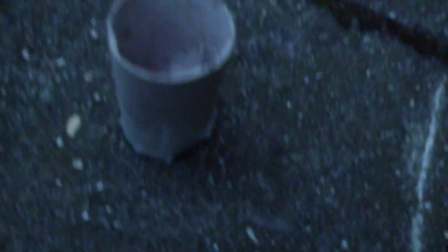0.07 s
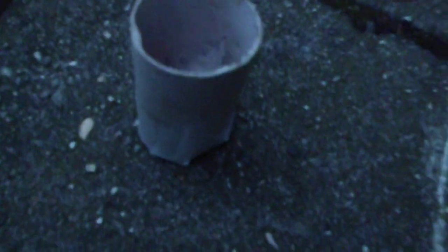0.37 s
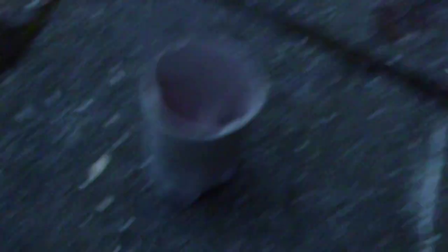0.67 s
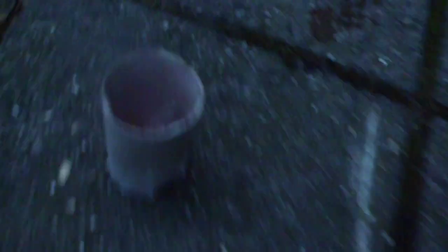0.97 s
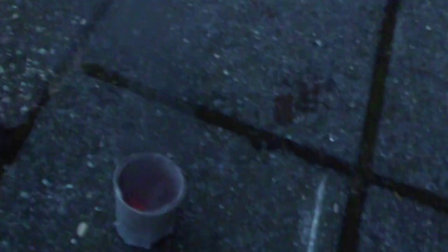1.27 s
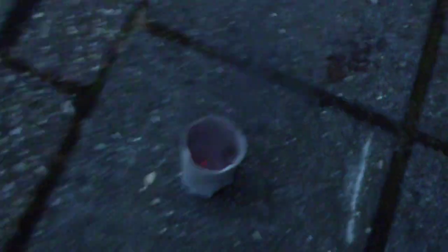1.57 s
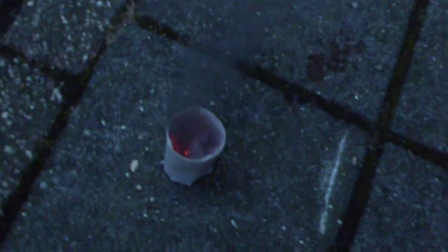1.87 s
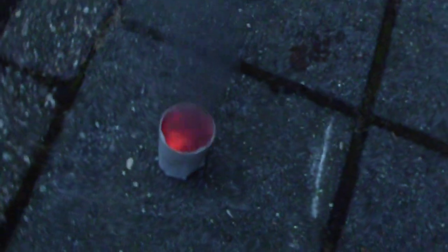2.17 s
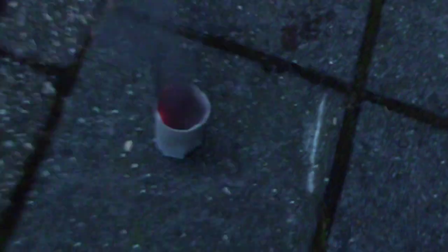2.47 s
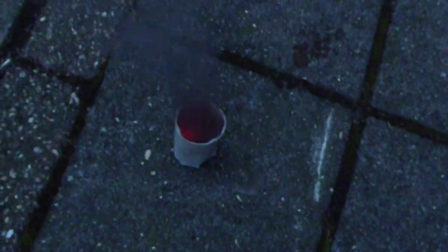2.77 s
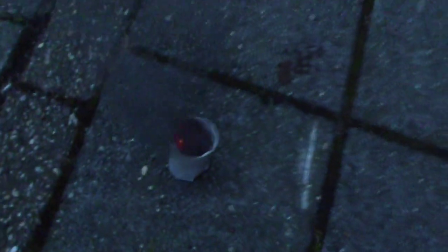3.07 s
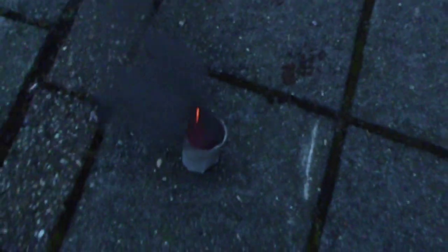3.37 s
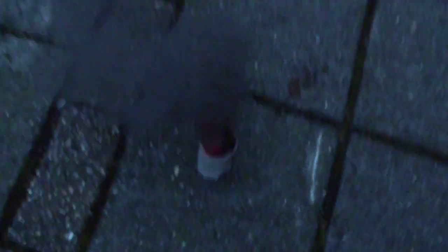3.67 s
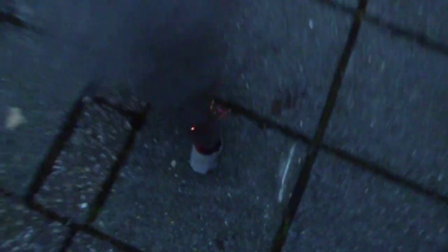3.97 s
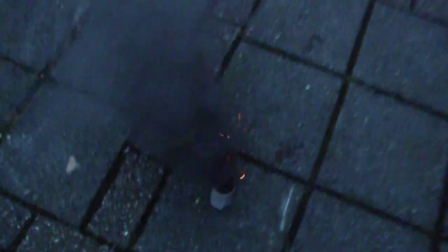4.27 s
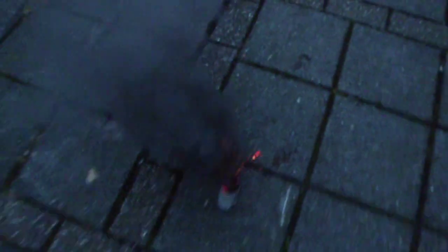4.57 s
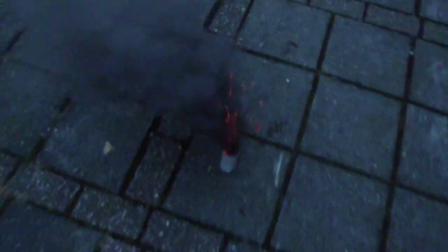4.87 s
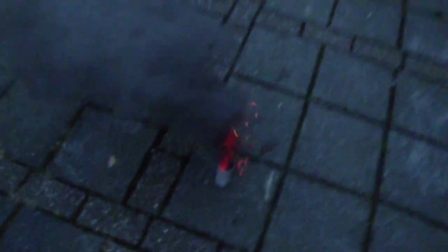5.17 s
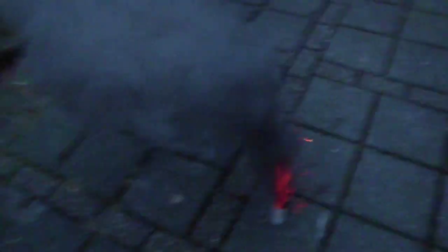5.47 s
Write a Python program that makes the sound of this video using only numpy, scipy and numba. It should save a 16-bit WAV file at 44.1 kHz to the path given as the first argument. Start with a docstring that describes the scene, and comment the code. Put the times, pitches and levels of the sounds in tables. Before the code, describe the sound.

A smoke mixture hisses steadily in a paper cup outdoors, with a few sharp clicks and dull bumps from handling the camera.

```python
"""A smoke mixture hisses in a paper cup on paving slabs, a step from a small hand-held camera. Rushing gas and
fine sputter blow the cup's resonances, which rise as the burn takes hold; once it spits. Up close, the camera's
case clicks and bumps in the hand. A low outdoor rumble lies underneath, and a faint wall echo colours hiss and
rumble. The recorder dulls the top, and the hardest clicks are flattened."""
import sys
import numpy as np
from scipy import signal
from scipy.fft import rfft, irfft
from scipy.io import wavfile
from scipy.ndimage import uniform_filter1d, map_coordinates
from numba import njit

SR = 44100
rng = np.random.default_rng(int(sys.argv[2]) if len(sys.argv) > 2 else 0)


def persist_wave(psi):
    """Save psi, clipped to +-1, as 16-bit WAV."""
    counts = np.round(np.clip(psi, -1, 1) * 32767).astype(np.int16)
    wavfile.write(sys.argv[1], SR, np.atleast_2d(counts).T)


N = 247842
TIME = np.arange(N) / SR
HIT_MS = 1000 * TIME[:2048]  # time within a one-shot

# The burn flares, sinks back, then takes hold. Each row: time in seconds, fader in dB,
# send of the upper pair in dB.
BURN_LEVELS = [(0,-32.5,-6.5),(.42,-33,-6.5),(.58,-29,-7),(.82,-29.5,-6.5),(.97,-34.3,-2.5),(1.3,-32,-5),(1.72,-34,-1),
               (2.3,-30,-4),(2.62,-28.5,-3),(3.3,-28.5,-3.5),(3.9,-29,-1.5),(4.85,-28,-2),(5.15,-28.5,-3),(5.62,-28,-2.5)]
# Hot gas tunes the cup. Each row: time in seconds, low resonance in Hz, send of its whistling core in dB.
CUP_TUNING = [(0,1132,-8.5),(.85,1150,-10),(1.3,1217,-11.5),(1.9,1197,-12.5),(2.25,1340,-15.5),(2.8,1255,-8.5),(3.75,1247,-0.5),(4.3,1354,-10),(5.62,1464,-16)]
# The body of the hiss. Each row: multiple of the low resonance, width in Hz, gain in dB.
LOW_MODES = [(.97, 460, -1), (.52, 540, -20)]
# An overtone on the body's shoulder. One row: multiple of the upper resonance, width in Hz, gain in dB.
OVERTONE = (0.48, 597, -6.5)
# The overtone swells with the burn. Each row: time in seconds, added gain in dB.
OVERTONE_SWELL = [(0,-2),(3.3,-1.5),(4.2,4),(5.62,2.5)]
# The upper resonance is a close pair. Each row: multiple of its pitch, width in Hz, gain in dB.
UPPER_MODES = [(0.928, 549, 2), (1.049, 537.4, 3)]
# The pair drifts. Each row: time in seconds, pitch in Hz, lean towards the lower mode in dB.
UPPER_TUNING = [(0,3490,-3.5),(1.3,3564,-4),(2.3,3510,-1.5),(3.1,3550,-2.5),(3.65,3420,4),(4.4,3500,-1),(5.15,3560,-1),(5.62,3740,-0.5)]
# The top sizzle shifts as the camera moves. Each row: time in seconds, pitch in Hz, send in dB,
# depth of the notch below it from 0 to 1.
SIZZLE_PATH = [(0,4600,-9,.92),(1.7,4610,-10.5,0.74),(2.5,4580,-12.5,0.2),(3.3,4290,-18.5,0.1),(3.75,4480,-16,0),(4.35,5010,-13.5,0.9),(5.05,5200,-12.5,0.2),(5.62,5310,-18,0.1)]
# A scoop between the low and upper resonances moves with the camera. Each row: time in seconds,
# centre in Hz.
SCOOP_PATH = [(0,2960),(.7,2940),(1.8,2305),(4.3,2710),(5.62,2950)]
# The tone of the outdoor bed. Each row: frequency in Hz, relative spectral level in dB.
RUMBLE_SPECTRUM = [(10,-4.5),(25,1.5),(45,-6),(100,-6.5),(200,-7.5),(400,-6.5),(700,-6.5),(1200,-8),(3000,-37)]
# The case clicks, plus one faint sputter of the mixture at 2.36 s sounded the same way. Each row: start in
# seconds, peak into the recorder in dB, brightest pitch in Hz, # spread in octaves, rattle in dB against the
# snap.
CASE_CLICKS = [(0.687,-12,3500,.7,-15),(.7092,-16.5,3170,0.51,-6),(0.789,-12,2700,0.34,-10),(0.8134,-1.5,5800,0.55,-20),(0.834,-19,2820,0.19,-5),
               (1.0227,3,4180,0.51,-9.5),(1.1723,-3.5,3200,1.3,-10),(1.229,-24,2310,.3,-13),(1.3078,-7,3410,0.11,-17),(1.362,-6.5,2740,0.36,-15),
               (2.361,-23.5,2300,0.27,-9),(2.4728,-14,2980,0.4,-10),(3.299,-21.5,3300,0.46,-15),(4.0977,1,4030,0.74,-7)]
# The ring of the case. Each row: pitch in Hz, gain in dB, time to fall 60 dB in ms.
CASE_MODES = [(2350,-1.5,13),(3003,-2.5,12),(3530,-2,6),(3970,-3.5,2.7),(4530,-0.5,4),(5380,-1,4)]
# Dull bumps of the hand. Each row: start in seconds, peak in dB, pitch in Hz, time to fall 60 dB in ms,
# knock in dB against the thud.
HAND_BUMPS = [(1.0223,-12.5,286,8,4),(1.0456,-20,417,9,-1),(1.3236,-25,450,10,4),(1.817,-22,262,14,-22),(1.8208,-21,690,34,-11),
              (1.8258,-16,606,4.6,14),(1.835,-21,554,7.5,7),(1.8575,-25.5,346,24,-7),(3.547,-28,190,20,-17),(4.377,-29.5,347,37,-17),
              (4.964,-23,352,20,-13),(5.403,-26.5,220,8.8,-9.5),(5.4506,-16,397,12,3),(5.562,-19.5,340,9,-6),(5.5976,-13.5,387,21,7)]
# One tight cluster of spits. Each row: start in seconds, peak in dB, pitch in Hz,
# time for the pop to fall 60 dB in ms.
SPITS = [(3.483,-18,1950,6),(3.4882,-17,770,21),(3.49,-11,1940,5.3),(3.506,-8,2310,2.9)]


def undb(db):
    """Decibels to gain."""
    return 10 ** (np.asarray(db) / 20)


def unit(x):
    """Scale to rms 1."""
    return x / np.sqrt(np.mean(x ** 2))


def peak(x, db):
    """Scale to a peak level."""
    return x * undb(db) / np.abs(x).max()


def curves(table):
    """Automation lanes: each column joined by straight lines in time."""
    times, *columns = np.transpose(table)
    return [np.interp(TIME, times, column) for column in columns]


def add(out, start_s, sound):
    """Drop a one-shot onto a track."""
    i = int(start_s * SR)
    out[i:i + len(sound)] += sound[:N - i]


@njit
def bandpass(x, hz, width_hz):
    """Sweepable state-variable band-pass, gain 1 at the centre."""
    y, band_state, low_state = np.empty(len(x)), 0., 0.
    for i in range(len(x)):
        g, damping = np.tan(np.pi * hz[i] / SR), width_hz / hz[i]
        band = (band_state + g * (x[i] - low_state)) / (1 + g * (g + damping))
        band_state = 2 * band - band_state
        low_state += 2 * g * band
        y[i] = damping * band
    return y


def resonance(x, hz, width_hz):
    """A steep resonance: the band-pass applied twice."""
    centre = hz * np.ones(len(x))
    return bandpass(bandpass(x, centre, width_hz), centre, width_hz)


def ring(hz, t60_ms):
    """A struck mode: a sine that dies away."""
    return np.sin(2 * np.pi * hz * HIT_MS / 1000) * np.exp(-np.log(1000) * HIT_MS / t60_ms)


def wander(per_s):
    """A smooth random modulator with a spread near 1."""
    hold = int(SR / per_s)
    steps = np.repeat(rng.standard_normal(2048)[:N // hold + 1], hold)
    return 1.3 * uniform_filter1d(uniform_filter1d(steps, hold), hold)[:N]


def gas(sputter_db, pops_per_s=900, spread_db=3.5):
    """Turbulent rush, peppered with the tiny pops of burning grains."""
    rush, polarity = rng.standard_normal((2, N))
    sizes = undb(spread_db * np.minimum(rng.exponential(size=N), 5))
    pops = (rng.random(N) < pops_per_s / SR) * sizes * np.sign(polarity)
    return rush + undb(sputter_db) * unit(pops)


def cup_voice(hz, width_hz, sputter_db, flicker_db=0.68):
    """One resonance of the cup, blown by the gas, flickering on its own."""
    return unit(resonance(gas(sputter_db), hz, width_hz)) * undb(flicker_db * wander(25))


def burn(flutter_db=0.35, surge_db=0.38, rush_db=-14, rush_waver_db=2.5):
    """Gas hisses from the cup's mouth in four layers that surge and flutter together."""
    level_db, upper_db = curves(BURN_LEVELS)
    low_hz, core_db = curves(CUP_TUNING)
    sizzle_hz, sizzle_db, _ = curves(SIZZLE_PATH)
    upper_hz, lean_db = curves(UPPER_TUNING)
    swell_db = curves(OVERTONE_SWELL)[0]

    low = sum(undb(db) * cup_voice(ratio * low_hz, width, sputter_db=-17)
              for ratio, width, db in LOW_MODES)
    core = undb(core_db - 2) * cup_voice(low_hz, width_hz=170, sputter_db=-7.5)
    ratio, width, db = OVERTONE
    overtone = undb(db + swell_db) * cup_voice(ratio * upper_hz, width, sputter_db=-8)
    body = unit(low + core + overtone)

    lower, higher = (undb(db) * cup_voice(ratio * upper_hz, width, sputter_db=-10)
                     for ratio, width, db in UPPER_MODES)
    lean = undb(lean_db)
    upper = unit((lean * lower + higher) / np.hypot(lean, 1))

    # the fizz on top slides with the sizzle and fades faster than it does
    fizz = undb(1 + 0.21 * sizzle_db) * cup_voice(1.155 * sizzle_hz, width_hz=2200, sputter_db=6)
    sizzle = unit(cup_voice(sizzle_hz, width_hz=810, sputter_db=-1) + fizz)

    rush = undb(rush_db + rush_waver_db * wander(5.2)) * cup_voice(2730, width_hz=1100, sputter_db=0.5)
    hiss = body + undb(upper_db + 0.18) * upper + undb(sizzle_db + 1.63) * sizzle + rush
    return hiss * undb(level_db + flutter_db * wander(30) + surge_db * wander(7.6))


def reflection_dips(x, notch_ratio=0.885, notch_width_hz=380, scoop_width_hz=350, scoop_depth=0.44):
    """Reflections partly cancel two bands: a notch under the sizzle and a scoop in the mids."""
    sizzle_hz, _, notch_depth = curves(SIZZLE_PATH)
    notched = x - notch_depth * bandpass(x, notch_ratio * sizzle_hz, notch_width_hz)
    return notched - scoop_depth * bandpass(notched, curves(SCOOP_PATH)[0], scoop_width_hz)


def outdoor_rumble(start_db=-45.5, rise_db_per_s=0.56, waver_db=1.5):
    """A dark bed of open-air noise that creeps up and wavers a little."""
    hz, db = np.transpose(RUMBLE_SPECTRUM)
    bin_hz = np.maximum(np.arange(N // 2 + 1) * SR / N, 1)
    tone = undb(np.interp(np.log(bin_hz), np.log(hz), db))
    rumble = irfft(rfft(rng.standard_normal(N)) * tone, N)
    return unit(rumble) * undb(start_db + rise_db_per_s * TIME + waver_db * wander(18))


def wall_echo(x, dull_hz=2400, start_lag_ms=11.8, closing_ms_per_s=0.749):
    """The camera backs towards a wall: a dull echo tightens and grows, sweeping a faint comb upwards."""
    lag_ms = start_lag_ms - closing_ms_per_s * TIME
    wet = 0.044 + 0.04 * TIME
    dull = signal.sosfiltfilt(signal.butter(2, dull_hz, fs=SR, output="sos"), x)
    echo = map_coordinates(dull, [np.arange(N) - lag_ms * SR / 1000], order=1)
    return x + wet * echo


def case_clicks(low_cut_hz=1900, rattle_attack_ms=0.36, rattle_t60_ms=11, rattle_breadth=2.86):
    """Each snap rings the case around its own brightest pitch, and the parts rattle briefly."""
    out = np.zeros(N)
    hz, mode_db, t60_ms = np.transpose(CASE_MODES)[:, :, None]
    low_cut = signal.butter(3, low_cut_hz, "high", fs=SR, output="sos")  # small parts radiate no bass
    attack = 1 - np.exp(-HIT_MS / rattle_attack_ms)
    envelope = attack * np.exp(-np.log(1000) * HIT_MS / rattle_t60_ms)
    for start, db, bright_hz, octaves, rattle_db in CASE_CLICKS:
        weights = undb(mode_db) * np.exp(-0.5 * (np.log2(hz / bright_hz) / octaves) ** 2)
        snap = peak(np.sum(weights * ring(hz, t60_ms), axis=0), 0)
        noise = rng.standard_normal(len(HIT_MS))
        rattle = envelope * unit(resonance(noise, bright_hz, rattle_breadth * octaves * bright_hz))
        click = signal.sosfilt(low_cut, snap + undb(rattle_db) * rattle)
        add(out, start, peak(click, db))
    return out


def hand_bumps(knock_hz=850, knock_t60_ms=7):
    """A finger's push swings the camera body: a short thud with a woody knock."""
    out = np.zeros(N)
    for start, db, hz, t60_ms, knock_db in HAND_BUMPS:
        knock = undb(knock_db) * ring(knock_hz, knock_t60_ms)
        add(out, start, peak(ring(hz, t60_ms) + knock, db))
    return out


def spits(puff_db=-13):
    """Gas pockets burst in the mixture: a quick pitched pop with a longer, breathy tail."""
    out = np.zeros(N)
    for start, db, hz, t60_ms in SPITS:
        noise = rng.standard_normal(len(HIT_MS))
        puff = unit(resonance(noise, hz, width_hz=hz)) * np.exp(-HIT_MS / t60_ms)
        add(out, start, peak(ring(hz, t60_ms) + undb(puff_db) * puff, db))
    return out


def scene():
    """The mono mix: cup and rumble feed the echo, the handling stays dry."""
    outdoors = reflection_dips(burn()) + spits() + outdoor_rumble()
    return (wall_echo(outdoors) + case_clicks() + hand_bumps())[None]


def record(dry, top_hz=5650, ceiling=0.68, dc_offset=0.011, output_top_hz=16200):
    """A narrow-band recorder with a slight offset; the sharpest clicks are flattened at their peaks, and the
    very top is trimmed."""
    high_cut = signal.firwin(131, top_hz, window=("kaiser", 7), fs=SR)
    narrow = signal.fftconvolve(dry, high_cut[None], "same")
    clipped = np.clip(narrow + dc_offset, -ceiling, ceiling)
    return signal.sosfilt(signal.ellip(8, 0.2, 70, output_top_hz, fs=SR, output="sos"), clipped)


dry = scene()
out = record(dry)
persist_wave(out)
```